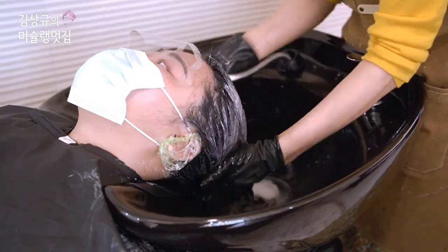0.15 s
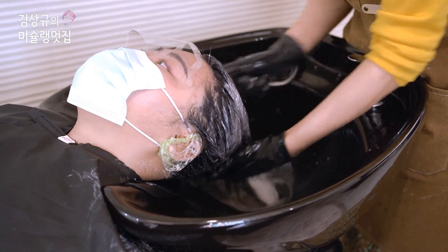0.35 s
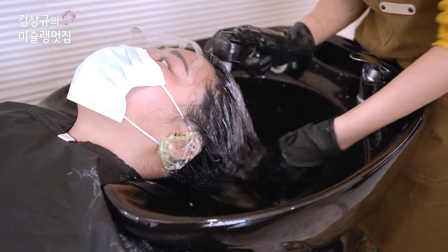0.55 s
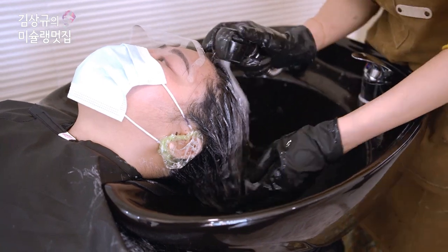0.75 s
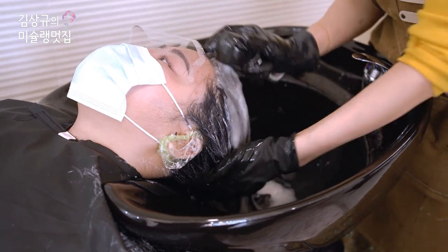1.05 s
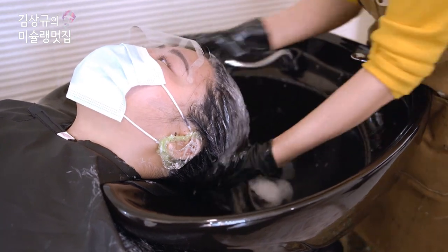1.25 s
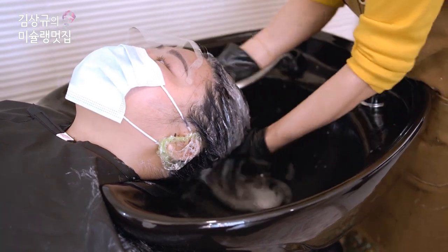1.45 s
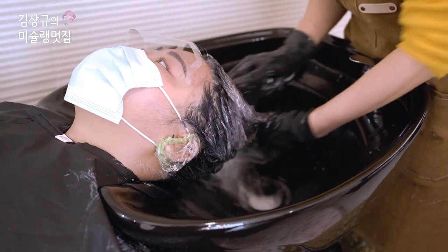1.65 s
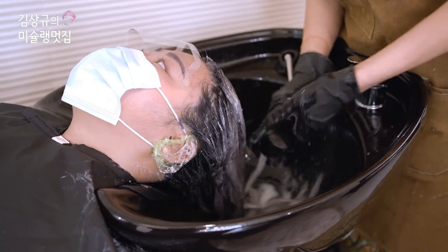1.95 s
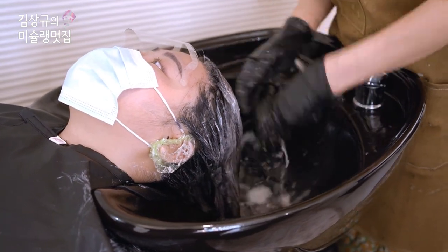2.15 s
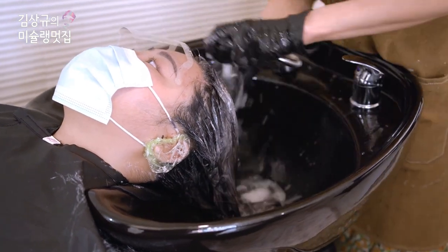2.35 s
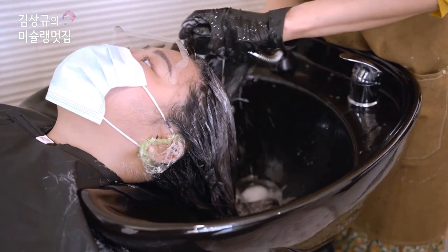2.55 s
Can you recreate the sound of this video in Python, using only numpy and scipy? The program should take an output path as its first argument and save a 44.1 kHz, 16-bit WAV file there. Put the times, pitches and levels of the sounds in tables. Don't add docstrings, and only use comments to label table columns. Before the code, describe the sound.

Water spray hissing over wet hair in a basin, with bubbly splashes and sharp wet slaps

```python
import sys
import numpy as np
from scipy import signal
from scipy.fft import rfft, irfft
from scipy.io import wavfile
from scipy.ndimage import uniform_filter1d

SR = 44100
rng = np.random.default_rng(int(sys.argv[2]) if len(sys.argv) > 2 else 0)


def linear_from_db(decibels):
    return 10 ** (np.asarray(decibels, float) / 20)


def unload_wav(signal):
    wavfile.write(
        sys.argv[1],
        SR,
        np.round(np.clip(np.atleast_2d(signal).T, -1, 1) * 32767).astype(np.int16),
    )


N = 119070

LEFT_RIGHT = np.array([[1], [-1]])


def rms_one(x):
    return x / np.sqrt(np.mean(x ** 2) + 1e-20)


def at_hz(points, hz):
    table_hz, value = np.array(points)[:, :2].T
    return np.interp(np.log(hz), np.log(table_hz), value)


def high_pass(x, hz, order):
    return signal.sosfilt(signal.butter(order, hz, "high", fs=SR, output="sos"), x)


def drift(rate):
    r = np.exp(-80 * np.pi * rate / SR)
    steps = rng.standard_normal(N // 40 + 2002)
    slow = signal.lfilter([1], [1, -2 * r, r * r], steps)[2000:]
    return np.interp(np.arange(N) / 40, np.arange(len(slow)), rms_one(slow))


# pitch in Hz, likeness from 0 to 1.
SIDE_LIKENESS = [(60, .9), (125, 1), (300, 0.94), (600, 0.7), (1200, 0.84), (2500, 0.47), (5000, 0.49),
                 (12000, 0.091)]


def likeness(hz):
    return np.clip(at_hz(SIDE_LIKENESS, hz), 0, 1)


def banded_noise(spectrum, shared_db, own_db, tilt_db=0):
    out, together = 0, drift(30)
    edges = np.geomspace(spectrum[0][0], spectrum[-1][0], num=14)
    white = rng.standard_normal((2, 2, N))
    for k, (low, high) in enumerate(zip(edges, edges[1:])):
        band = signal.butter(2, [low, high], "band", fs=SR, output="sos")
        mid, side = signal.sosfilt(band, white[k % 2])
        hz = np.sqrt(low * high)
        alike = likeness(hz)
        flicker_db = shared_db * together + own_db * drift(11)
        gain = linear_from_db(at_hz(spectrum, hz) + flicker_db + tilt_db * np.log2(hz / 4000))
        out = out + gain * (np.sqrt(1 + alike) * mid + np.sqrt(1 - alike) * side * LEFT_RIGHT)
    return rms_one(out)


def pings(s, gain, hz, t60, size, attack=0.92, rise=.003):
    t = np.arange(size) / SR
    cycles = hz[:, None] * t
    ring = np.sin(2 * np.pi * cycles * (1 + rise * cycles))
    fade = linear_from_db(-60 * t / t60[:, None])
    onset = np.minimum(cycles / attack, 1)
    audible = cycles * (1 + 2 * rise * cycles) / (t + 1e-9) < .45 * SR
    wave = ring * fade * onset * audible
    at = (np.clip(s * SR, 0, N).astype(int)[:, None] + np.arange(size)).ravel()
    return np.array([np.bincount(at, (g[:, None] * wave).ravel(), N + size + 1)[:N] for g in gain])


def placed(size_db, hz, chance):
    alike = likeness(hz)
    side = np.sqrt((1 - alike) / (1 + alike)) * 0.68 * chance
    sign = np.sign(np.roll(chance, 1))
    return linear_from_db(size_db) * sign * np.array([1 + side, 1 - side])


def swarm(table, cycles, skew, count, size):
    start, length, db, hz, spread = np.transpose(table)[:, :, None]
    u = rng.random((len(table), 2, count))
    z = rng.standard_normal((len(table), 3, count))
    when = start + length * (u[:, 0] ** skew + u[:, 1] ** skew) / 2
    pitch = np.clip(hz * 2 ** (spread * np.maximum(z[:, 0], -2)), 200, 15000).ravel()
    each_db = db + 10 * np.log10(length * hz / count / cycles) + 12.5 + 3.5 * z[:, 1]
    gain = placed(each_db.ravel(), pitch, z[:, 2].ravel())
    return pings(when.ravel(), gain, pitch, cycles / pitch, size)


def basin(x):
    out = x.copy()
    for lag in rng.uniform(0.0013, .03, (7, 2)):
        for side in range(2):
            n = int(lag[side] * SR)
            out[side, n:] += linear_from_db(-10 - 350 * lag[side]) * rng.choice([-1, 1]) * x[side, :-n]
    return out


# pitch in Hz, level in dB per Hz.
QUIET_COLOUR = [(50, 0), (300, 4), (900, 0), (1500, -6), (7000, -12.5), (10000, -20), (14000, -27)]


def quiet_room():
    return linear_from_db(-55) * banded_noise(QUIET_COLOUR, 0.76, 0.33)


# time in seconds, peak in dB, pitch in Hz.
WET_SLAPS = [(0.030, -26.5, 2230), (.0883, -15.5, 1800), (.2862, -21, 7800), (.2915, -16, 7900),
             (0.726, -22, 1510), (.979, -22, 4300), (1.182, -28, 10500), (1.41, -29, 8000),
             (1.9481, -21, 3000), (1.952, -0.5, 2960), (1.9575, -13, 3350), (1.9601, -1, 3540),
             (1.9725, -14, 6000), (2.0185, -22, 7500), (2.051, -22, 11000), (2.285, -14, 5900),
             (2.2973, -0.5, 5800), (2.3077, -21, 3600), (2.312, -18, 4400), (2.3205, -13, 4500),
             (2.326, -20, 7000), (2.485, -28, 6000), (2.493, -29, 3520)]


def slaps():
    s, db, hz = np.transpose(WET_SLAPS)
    cycles, echo_db = 9, -4
    crack = 0
    for ratio, rel_db in ((.75, -2), (1.25, -5.5), (2.2, -14.5)):
        gain = linear_from_db(db + rel_db) * np.ones((2, 1))
        crack = crack + pings(s, gain, np.minimum(hz * ratio, 15000), cycles / hz, size=400, attack=1.3)
    echoes = basin(crack) - crack
    return high_pass(crack + linear_from_db(echo_db) * echoes, 1170, order=4)


def droplets(count):
    z = rng.standard_normal((count, 2))
    pitch = np.clip(3200 * 2 ** (0.59 * z[:, 0]), 1100, 15000)
    size_db = 4.5 * np.minimum(rng.exponential(1, count), 4)
    when = rng.random(count) * N / SR
    return rms_one(pings(when, placed(size_db, pitch, z[:, 1]), pitch, 12.0 / pitch, size=250))


# time in seconds, level in dB, brightness in dB per octave.
SPRAY_FLOW = [(.07, -37.5, -0.5), (.11, -40.5, 0.7), (.3, -38.5, 0.5), (.52, -41, 0.8), (.7, -38.5, -0.26),
              (.95, -39.5, 0.6), (1.1, -38.5, -0.1), (1.3, -39, -1), (1.42, -45, 0.2), (1.481, -48, 1),
              (1.55, -52.5, -0.3), (1.566, -42, -1.1), (1.68, -40, -1.6), (1.9, -39, 0.6),
              (2.12, -38.5, -0.5), (2.2, -39.5, 2.6), (2.45, -38, 1.1), (2.7, -41, .1)]
# pitch in Hz, level in dB per Hz.
HISS_COLOUR = [(500, -13), (900, -27.5), (1300, -8), (1900, -1.5), (4000, -4), (8000, -5), (12000, -8.5),
               (16500, -13)]


def spray():
    hiss_db, drops_db = 4, -27.5
    s, level_db, tilt_db = np.transpose(SPRAY_FLOW)
    t = np.arange(N) / SR
    hiss = linear_from_db(hiss_db) * banded_noise(HISS_COLOUR, 0.68, 0.7, np.interp(t, s, tilt_db))
    drops = linear_from_db(drops_db) * droplets(count=4000)
    return linear_from_db(np.interp(t, s, level_db)) * (hiss + drops)


# pitch in Hz, level in dB per Hz.
ROOM_COLOUR = [(40, -44), (100, -15.5), (160, -3.5), (250, 1), (320, 0.5), (450, -8), (800, -3), (1300, 0)]


def room_and_pipes():
    return linear_from_db(-56) * banded_noise(ROOM_COLOUR, 0.37, 2.7)


# time in seconds, peak in dB, pitch in Hz, time to fade 60 dB in seconds.
BASIN_THUDS = [(.07, -48, 110, 0.11), (0.997, -37.5, 199, 0.21), (1.166, -36.5, 181, 0.11),
               (1.278, -42.5, 486, 0.21), (1.283, -34, 284.5, 0.21), (1.288, -42, 690, 0.11),
               (1.29, -38, 163, 0.18), (1.305, -40.5, 216, 0.14), (1.33, -36, 304, 0.126),
               (1.955, -46, 640, 0.056), (2.031, -27, 210, 0.046), (2.05, -38, 257, 0.12),
               (.725, -46.5, 560, 0.069), (1.42, -47.5, 226, 0.28)]


def thuds():
    s, db, hz, t60 = np.transpose(BASIN_THUDS)[:, :, None] * np.ones(9)
    late, uneven, detune = rng.standard_normal((len(BASIN_THUDS), 3, 9)).transpose(1, 0, 2)
    when = (s - .006 + 0.0062 * np.abs(late)).ravel()
    gain = linear_from_db(db - 11.5 + 1.8 * uneven).ravel() * np.ones((2, 1))
    pitch = (hz * 2 ** (0.161 * detune)).ravel()
    clump = pings(when, gain, pitch, 1.02 * t60.ravel(), size=6000, attack=0.68, rise=0)
    return high_pass(clump, 143, order=2)


# start in seconds, length in seconds, level in dB, pitch in Hz, spread in octaves.
BUBBLY_SPLASHES = [(.086, 0.043, -40.5, 1720, 0.18), (.178, 0.044, -32, 3850, 0.11),
                   (.18, 0.04, -33, 2230, 0.21), (.195, 0.044, -30, 1760, 0.42),
                   (.203, 0.038, -28.5, 2690, 0.053), (.225, 0.026, -24, 1774, 0.21),
                   (.238, 0.023, -24, 2050, 0.19), (.255, .03, -33.5, 1820, 0.22),
                   (.275, 0.043, -41.5, 1820, 0.24), (.72, 0.027, -43, 1380, 0.43),
                   (1.225, 0.042, -45, 1780, 0.041), (1.56, 0.1, -46.5, 1090, 0.1),
                   (1.58, .08, -41.5, 1510, 0.265), (1.59, 0.033, -40, 2150, 0.17),
                   (1.645, 0.06, -39.5, 1590, .15), (1.69, 0.054, -42, 2100, 0.15),
                   (1.68, 0.047, -43.5, 3110, 0.21), (1.645, 0.047, -42.5, 7700, 0.015),
                   (1.675, 0.063, -49, 7900, .015), (1.878, 0.018, -37.5, 1890, 0.42),
                   (2.208, 0.031, -34.5, 2280, 0.093), (2.225, 0.021, -35.5, 3080, 0.46),
                   (2.253, .017, -31.5, 4150, 0.41), (2.37, 0.035, -42, 1820, 0.22),
                   (1.952, 0.027, -41, 1150, 0.21)]


def splashes():
    return swarm(BUBBLY_SPLASHES, cycles=37.5, skew=1.1, count=300, size=450)


# start in seconds, length in seconds, level in dB, pitch in Hz,
# spread in octaves.
FINE_SPATTERS = [(.283, 0.016, -36.5, 8900, 0.35), (.975, .03, -35, 5500, 0.46), (.99, 0.16, -39, 5520, .6),
                 (1.175, 0.027, -40, 9800, .4), (1.345, 0.049, -40.5, 5230, 0.42),
                 (1.4, 0.031, -37.5, 7350, 0.29), (1.44, 0.019, -41.5, 6450, 0.46),
                 (1.946, 0.031, -28.5, 3540, 0.32), (1.97, 0.04, -35, 3120, 0.17),
                 (1.99, 0.03, -30.5, 9300, 0.22), (2.012, 0.018, -34, 4300, 0.18),
                 (1.96, 0.15, -31, 7020, 0.57), (2.03, 0.072, -34, 12700, 0.45),
                 (2.19, 0.049, -35, 8250, 0.54), (2.282, 0.02, -33, 6170, 0.3),
                 (2.295, 0.059, -31, 5940, 0.6), (2.3, 0.15, -34.5, 7160, 0.54),
                 (2.482, 0.03, -34, 6370, 0.58)]


def spatters():
    return swarm(FINE_SPATTERS, cycles=16.6, skew=1.8, count=350, size=200)


def thrown_water():
    water = high_pass(splashes() + spatters(), 738, order=8)
    return linear_from_db(-1 / 2 * LEFT_RIGHT) * basin(water)


def scene():
    water_starts_s = .0685
    on = np.clip((np.arange(N) / SR - water_starts_s) / .001, 0, 1)
    background = (1 - on) * quiet_room() + on * (spray() + room_and_pipes())
    return background + slaps() + thuds() + thrown_water()


# pitch in Hz, left minus right in dB.
SIDE_BALANCE = [(60, -1), (240, 1), (950, -1.5), (3770, -0.5), (15000, -2)]


def balanced(x):
    hz = np.fft.rfftfreq(N, 1 / SR) + 1
    gain = linear_from_db(at_hz(SIDE_BALANCE, hz) / 2 * LEFT_RIGHT) * (hz < 15850)
    return irfft(rfft(x) * gain, N)


def duck_bass(x):
    duck_above_db = -43.5
    hz = np.fft.rfftfreq(N, 1 / SR) + 1
    bass = irfft(rfft(x) / (1 + (hz / 380) ** 6), N)
    power = uniform_filter1d(np.mean(x ** 2, axis=0), size=1500)
    bass_gain = 1 / np.sqrt(1 + (power / linear_from_db(2 * duck_above_db)) ** 0.7)
    return x - bass * (1 - bass_gain)


# pitch in Hz, threshold as a share of the local power.
NOISE_REDUCTION = [(600, .02), (3000, .3), (8000, .55), (14000, .95)]


def thinned(x):
    hz, _, cells = signal.stft(x, SR, nperseg=2048)
    power = uniform_filter1d(np.abs(cells) ** 2, size=5, axis=1)
    local_power = uniform_filter1d(power, size=61, axis=1)
    threshold = at_hz(NOISE_REDUCTION, hz + 1)[:, None] * local_power
    keep = 1 / (1 + (threshold / (power + 1e-30)) ** 4)
    return signal.istft(cells * keep, SR, nperseg=2048)[1][:, :N]


def top_cut(x):
    return signal.sosfilt(signal.butter(12, 15860, fs=SR, output="sos"), x)


def record(dry):
    x = high_pass(balanced(dry), 97, order=2)
    mix = thinned(duck_bass(x))
    return top_cut(mix)


dry = scene()
out = record(dry)
unload_wav(out)
```